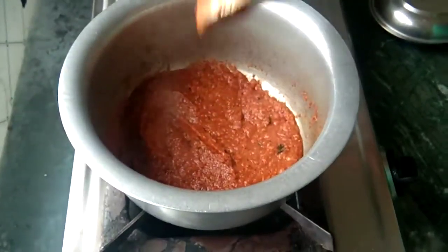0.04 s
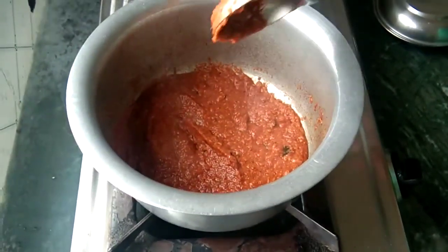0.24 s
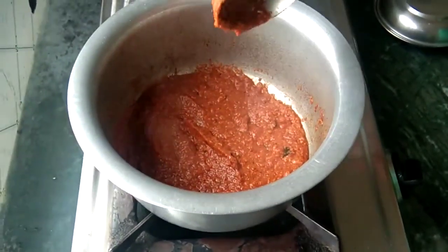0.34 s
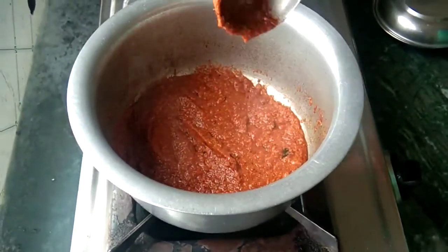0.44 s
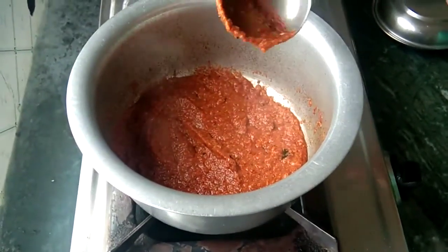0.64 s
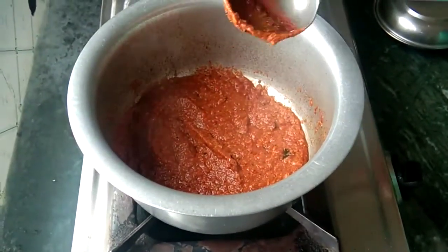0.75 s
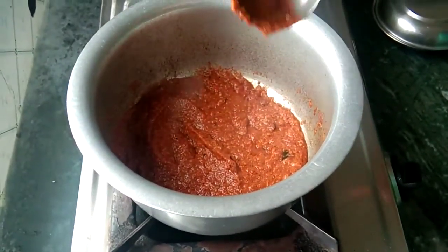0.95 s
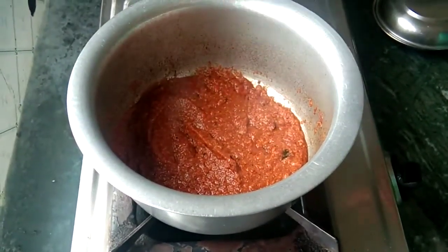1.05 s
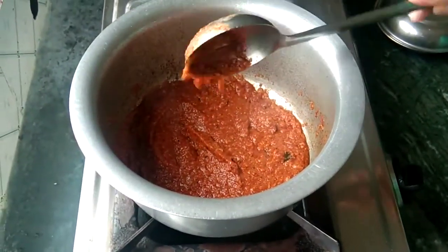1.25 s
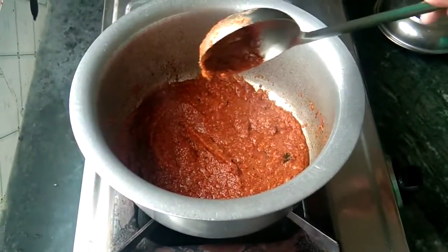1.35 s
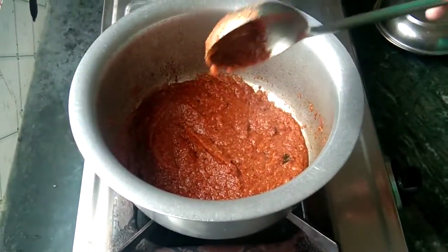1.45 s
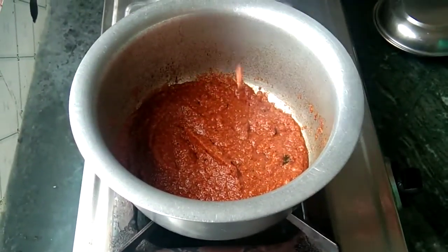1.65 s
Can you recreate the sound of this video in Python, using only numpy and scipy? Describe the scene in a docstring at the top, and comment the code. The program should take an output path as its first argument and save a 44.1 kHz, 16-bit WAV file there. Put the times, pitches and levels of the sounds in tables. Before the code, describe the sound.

Loud metal clank of ladle against cooking pot, brief chatter, ringing fade, paste simmering and popping.

```python
"""A steel ladle knocks once on the rim of an aluminium pot and chatters briefly against it.
Close perspective, one mono microphone: decaying sine modes make the ladle ring short and bright and the
pot sing on, with noise bursts for the clash; fading noise answers from a hard-walled kitchen, below the ring.
Thick paste simmers (shaped hiss, tiny clicks) and pops (resonant noise snaps) throughout, over a low hum
of wavering sines. The recorder's gain ducks at the clank and recovers."""
import sys
import numpy as np
from scipy import signal
from scipy.fft import rfft, irfft
from scipy.io import wavfile
from scipy.ndimage import uniform_filter1d

SR = 44100
rng = np.random.default_rng(int(sys.argv[2]) if len(sys.argv) > 2 else 0)


def int16_out(signal):
    """Quantize to a 16-bit WAV file."""
    q = np.round(np.clip(np.atleast_2d(signal).T, -1, 1) * 32767)
    wavfile.write(sys.argv[1], SR, q.astype(np.int16))


N = 74970
T = np.arange(N) / SR  # s


def amp(db):
    """Decibels to amplitude gain."""
    return 10 ** (np.asarray(db) / 20)


def unit(x):
    """Scales to rms 1."""
    return x / np.sqrt(np.mean(x ** 2) + 1e-20)


def read(points, hz):
    """Interpolates a table on a log-frequency axis."""
    f, value = np.transpose(points)
    return np.interp(np.log(hz + 1), np.log(f + 1), value)


def curve(points):
    """Draws a table of times and levels as a level in dB at every sample."""
    s, db = np.transpose(points)
    return np.interp(T, s, db)


def fade(t60, t=T):
    """Exponential decay that loses 60 dB in t60 seconds."""
    return np.exp(-np.log(1000) * t / t60)


def add(mix, s, sound):
    """Adds a sound into the mix at s seconds, cut at the end of the mix."""
    part = mix[max(round(s * SR), 0):][:len(sound)]
    part += sound[:len(part)]


def coloured(x, spectrum):
    """Gives x a spectrum, at rms 1."""
    hz = np.fft.rfftfreq(len(x), 1 / SR)
    return unit(irfft(rfft(x) * amp(read(spectrum, hz)), len(x)))


def band(x, hz, width):
    """Keeps one bell-shaped band of x, scaled so that a click keeps about its energy."""
    edges = np.clip([hz - width / 2, hz + width / 2], 50, SR / 2.1)
    bell = signal.butter(2, edges, "bandpass", fs=SR, output="sos")
    return signal.sosfilt(bell, x) * np.sqrt(SR / 2 / width)


def waver():
    """Slow random drift, at rms 1: noise smoothed twice."""
    smooth = uniform_filter1d(rng.standard_normal(N), size=1200)
    return unit(uniform_filter1d(smooth, size=1200))


def tone(hz, db):
    """A sine on a pitch curve, at an rms level."""
    return np.sqrt(2) * amp(db) * np.sin(2 * np.pi * np.cumsum(hz) / SR)


HUM_HZ, HUM_WAVER = 118.5, .023  # centre pitch; rms drift as a share of it
DRONE_WAVER_HZ, DRONE_WAVER_DB = 3.2, 4  # rms drift of pitch and level
# rms level of the hum: t/s, level/dB
HUM_LEVEL = [(0, -62), (.2, -64), (.45, -61), (.77, -61.5), (1.1, -61.5), (1.28, -63), (1.358, -51),
             (1.43, -54.5), (1.5, -49), (1.53, -57), (1.62, -54), (1.66, -76), (1.7, -66)]
# faint tones in the room, pitch and level before they waver: f/Hz, level/dB
DRONE_TONES = [(64, -73.5), (195, -76.5), (308, -68.5)]


def hum():
    """A low, wavering hum that swells near the end, among fainter tones that come and go."""
    out = tone(HUM_HZ * (1 + HUM_WAVER * waver()), curve(HUM_LEVEL))
    for hz, db in DRONE_TONES:
        out += tone(hz + DRONE_WAVER_HZ * waver(), db + DRONE_WAVER_DB * waver())
    return out


def softened(x):
    """Thick paste gives little above its highest resonance: a steep low-pass."""
    return signal.sosfilt(signal.butter(8, 8500, fs=SR, output="sos"), x)


SIZZLE_DB, CRACKLE_DB = -54, -61  # rms, before the simmer level is applied
CRACKLE_PER_S, CRACKLE_SPREAD_DB = 350, 5  # mean rate; mean of the random sizes before their cap
# spectrum of steady sizzle and room air: f/Hz, relative level/dB per Hz
SIZZLE_SPECTRUM = [(25, -14), (45, -27), (65, -5), (120, 7.5), (220, -2), (310, -1.5), (450, -3), (800, -2),
                   (1150, -13.5), (1450, -3), (1950, -9), (2350, 1.5), (3000, -7.5), (3900, -7),
                   (4600, -14), (5800, -5.5), (7000, -9), (8300, -17), (9500, -36.5), (12500, -38.5),
                   (15500, -40)]
# gain on hiss and crackle together: t/s, level/dB
SIMMER_LEVEL = [(0, 2), (.1, -1.5), (.19, -2), (.6, 1), (.95, 1.5), (1.12, 1), (1.25, -0.5), (1.45, 0),
                (1.7, 0.5)]
# resonances of a pop (low, mid, its overtone, high), shared with the crackle: f/Hz, width/Hz
POP_RESONANCES = [(1350, 1120), (2450, 520), (3700, 960), (6200, 1630)]


def sizzle():
    """Soft hiss of the simmering paste, and its countless tiny crackles at random moments."""
    size_db = CRACKLE_SPREAD_DB * np.minimum(rng.exponential(1, N), 4)
    sizes = amp(size_db) * rng.choice([-1, 1], N)
    crackle = np.zeros(N)
    for hz, width in POP_RESONANCES[1::2]:  # mid and high only
        clicks = sizes * (rng.random(N) < CRACKLE_PER_S / SR)
        crackle += band(clicks, hz, width)
    hiss = coloured(rng.standard_normal(N), SIZZLE_SPECTRUM)
    simmer = amp(SIZZLE_DB) * hiss + amp(CRACKLE_DB) * unit(softened(crackle))
    return amp(curve(SIMMER_LEVEL)) * simmer


POP_DB, POP_OVERTONE_DB = 9, -8.5  # gain on every pop; overtone relative to the mids
POP_T60, POP_TAIL_DB, POP_TAIL_T60 = .011, -20, .17  # snap s; tail relative to the snap dB, s
POP_CLICK = 2  # amplitude of the click before its band is levelled
# bubbles bursting in the paste, before the common gain: t/s, lows level/dB, mids level/dB, highs level/dB
BUBBLES = [(0.0575, -53.5, -53, -58), (0.0893, -63, -49, -59.5), (.1322, -68, -55.5, -57.5),
           (0.1648, -67, -59, -59), (.6911, -52, -48.5, -56), (0.7753, -61, -54, -52),
           (0.805, -53.5, -50.5, -56), (0.8563, -50, -50, -51.5), (0.911, -50.5, -64, -52.5),
           (0.937, -55, -59, -54.5), (0.965, -58, -68, -61), (1.0107, -60, -49.5, -64),
           (1.03, -55, -54.5, -70), (1.083, -59, -62, -58), (1.0975, -64, -56.5, -51.5),
           (1.197, -58, -50.5, -59), (1.252, -60, -61, -72), (1.29, -55, -55, -57), (1.3299, -55, -53, -56),
           (1.4068, -77, -51, -60), (1.478, -51, -58.5, -62), (1.49, -64.5, -55.5, -55),
           (1.5915, -77, -51.5, -54), (1.647, -55.5, -49.5, -54), (1.6935, -60, -67, -51.5)]


def pops():
    """A bursting bubble clicks and snaps in a few resonances, with a faint tail from pot and room."""
    out, t = np.zeros(N), T[:8192]
    shape = fade(POP_T60, t) + amp(POP_TAIL_DB) * fade(POP_TAIL_T60, t)
    for s, low, mid, high in BUBBLES:
        levels = (low, mid, mid + POP_OVERTONE_DB, high)
        for db, (hz, width) in zip(levels, POP_RESONANCES):
            burst = POP_CLICK * (t == 0) + shape * rng.standard_normal(len(t))
            snap = band(burst, hz, width)
            level = np.linalg.norm(shape) / np.linalg.norm(snap)  # evens out chance differences in energy
            add(out, s, amp(POP_DB + db) * snap * level)
    return softened(out)


KITCHEN_DB, KITCHEN_RISE_S = -14, .02
# spectrum of the kitchen's answer: f/Hz, relative level/dB per Hz
KITCHEN_SPECTRUM = [(40, -24), (63, -13), (100, -18), (275, -13.5), (305, -2.5), (800, -6.5), (1300, -6),
                    (2000, -3.5), (2500, 4), (3300, 0), (4200, 1.5), (6000, 4.5), (7500, -0.5), (8800, -14),
                    (11500, -31), (15500, -40)]
# decay of the kitchen's answer: f/Hz, t60/s
KITCHEN_DECAY = [(63, 0.85), (300, 0.74), (1000, 1.074), (2500, 0.78), (4500, 0.57), (7000, 0.64),
                 (12000, 0.3)]


def kitchen():
    """Diffuse echo of the knock: noise that swells, then dies at its own speed in each band."""
    noise = coloured(rng.standard_normal(N), KITCHEN_SPECTRUM)
    hz, t, z = signal.stft(noise, SR, nperseg=1024)
    decay = fade(read(KITCHEN_DECAY, hz)[:, None], t)
    tail = signal.istft(z * decay, SR, nperseg=1024)[1][:N]
    return amp(KITCHEN_DB) * tail * (1 - np.exp(-T / KITCHEN_RISE_S))


RING_ECHO_DB, RING_ECHO_T60 = -15, .55  # relative to the direct ring; s


def echoed(x):
    """The walls return the ringing as a dense random echo, so that each partial beats as it fades."""
    walls = rng.standard_normal(N) * fade(RING_ECHO_T60)
    echo = signal.fftconvolve(x, walls / np.linalg.norm(walls))[:N]
    return x + amp(RING_ECHO_DB) * echo


RING_RISE_S = .0018


def ring(modes):
    """Free ringing after a blow: decaying sines at random phases, with a short linear rise."""
    tones = np.zeros(N)
    for hz, db, t60 in modes:
        tones += amp(db) * fade(t60) * np.sin(2 * np.pi * (hz * T + rng.random()))
    return tones * np.minimum(T / RING_RISE_S, 1)


def clash(spectrum, t60):
    """The many short, overlapping modes that one contact sets off: a coloured, fading noise burst."""
    burst = rng.standard_normal(N) * fade(t60)
    gain = amp(read(spectrum, abs(np.fft.fftfreq(1024, 1 / SR))))
    # minimum phase keeps the onset sharp
    colour = np.fft.ifft(np.exp(signal.hilbert(np.log(gain)).conj())).real
    return signal.fftconvolve(burst, colour / np.linalg.norm(colour))[:N]


KNOCK_S = .2002
CLASH_DB, CLASH_T60 = -6, .055  # gain on every contact of the knock; s
CHATTER_T60, CHATTER_RING_DB = .09, -21  # s; ladle ring relative to its table
# ringing modes of the steel ladle: f/Hz, level/dB, t60/s
LADLE_MODES = [(4000, -17, .09), (4073, -11, .19), (4409, -17, .35), (4572, -11, .12), (4646, -22, .42),
               (5735, -12, .09), (6071, -11, .12), (6556, 0, .07), (6600, -21, .4), (6636, -6, .11),
               (6640, -19, .48), (7333, -2, .075), (7487, -5, .075), (7547, -1, .075), (7805, -7, .1)]
# ringing modes of the aluminium pot: f/Hz, level/dB, t60/s
POT_MODES = [(371, -38, .9), (430, -30, .2), (506, -38, .9), (689, -35, .8), (743, -39, .9),
             (808, -38, 1.3), (976, -52, 3.5), (1399.5, -24, .8), (1894.5, -23, 1.25), (2174, -37, 1.75),
             (2374, -18, .22), (2460, -21, .3), (2522, -28, 1.05), (2688, -28, .85), (2738, -13, .12),
             (2971, -24, .8), (3085, -28, .6), (3177, -21, .5), (3300, -18, .15), (3457, -17, .24),
             (3520, -17, .11)]
# low boom under the blow, likely the stove: f/Hz, level/dB, t60/s
STOVE_MODES = [(65.7, -46, 1.45), (156, -52, 1.0)]
# contacts of the ladle's bowl on the rim, before the clash gain: t/s after the knock, level/dB
KNOCK_CONTACTS = [(0, -6), (.0012, 0), (.0042, -3), (.0125, -5)]
# dense clash of both metals at a knock contact: f/Hz, relative level/dB per Hz
CLASH_SPECTRUM = [(60, -21), (260, -20), (320, -2.5), (560, -11), (900, -16), (1900, -7.5), (2450, -1),
                  (3400, 3.5), (5000, -0.5), (6500, 0.5), (7800, 3.5), (8800, -13), (11500, -24),
                  (15500, -30)]
# lighter contacts as the ladle chatters on the rim: t/s, level/dB
CHATTER_CONTACTS = [(.2935, -30), (.3096, -21.5), (.3431, -23.5), (.356, -29), (.372, -32), (.397, -31),
                    (.4224, -32), (.433, -32), (.474, -39)]
# duller spectrum of the lighter contacts: f/Hz, relative level/dB per Hz
CHATTER_SPECTRUM = [(100, -23), (350, 3.5), (800, 1), (1600, 8), (2500, 6), (3300, 10.5), (4300, -13),
                    (6000, -17), (7500, -2.5), (8800, -11.5), (11500, -30), (15500, -33)]


def clank():
    """The knock rings ladle, pot and stove; lighter contacts follow."""
    out = np.zeros(N)
    metal = ring(LADLE_MODES) + ring(POT_MODES)
    add(out, KNOCK_S, echoed(metal) + ring(STOVE_MODES) + kitchen())
    for delay, db in KNOCK_CONTACTS:
        add(out, KNOCK_S + delay, amp(CLASH_DB + db) * clash(CLASH_SPECTRUM, CLASH_T60))
    for s, db in CHATTER_CONTACTS:
        tap = clash(CHATTER_SPECTRUM, CHATTER_T60)
        tap += amp(CHATTER_RING_DB) * ring(LADLE_MODES)
        add(out, s, amp(db) * tap)
    return out


def scene():
    """The clank over the simmering pot, on one channel."""
    return (clank() + pops() + sizzle() + hum())[None]


LIMIT_DB, LIMIT_SHARE = -13.5, .68  # threshold; share of the held excess that is taken off
RELEASE_DB_PER_S = 55  # fall of the held level, before the share is taken
CEILING, EDGE_HZ = .82, 15600  # peak amplitude where rounding begins; upper band limit


def record(dry):
    """Gain control ducks at once and recovers steadily; peaks are rounded off; then the band limit."""
    power_db = 10 * np.log10(abs(uniform_filter1d(dry[0] ** 2, size=128)) + 1e-12)
    # hold the highest level so far, let down at a steady rate
    fall = T * RELEASE_DB_PER_S
    held_db = np.maximum.accumulate(power_db + fall) - fall
    over_db = np.maximum(held_db - LIMIT_DB, 0)
    ducked = dry * amp(-LIMIT_SHARE * uniform_filter1d(over_db, size=64))
    # subtract a smoothed copy of what exceeds the ceiling
    overshoot = ducked - np.clip(ducked, -CEILING, CEILING)
    rounded = ducked - signal.sosfiltfilt(signal.butter(4, 9000, fs=SR, output="sos"), overshoot)
    band_limit = signal.firwin(255, EDGE_HZ, window=("kaiser", 8), fs=SR)
    return signal.oaconvolve(rounded, band_limit[None], "same")


dry = scene()
out = record(dry)
int16_out(out)
```